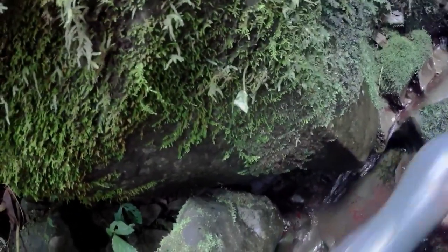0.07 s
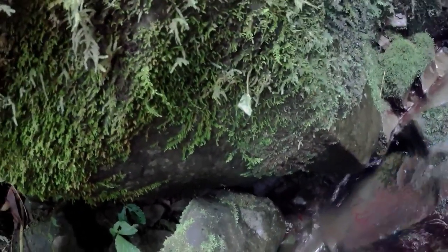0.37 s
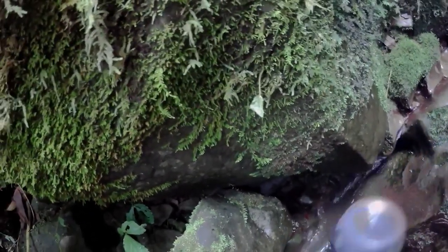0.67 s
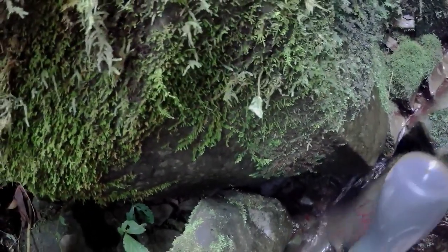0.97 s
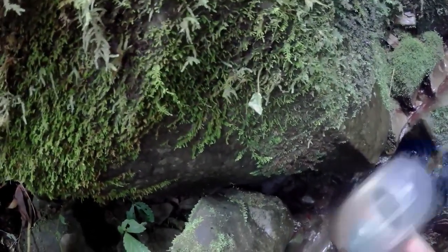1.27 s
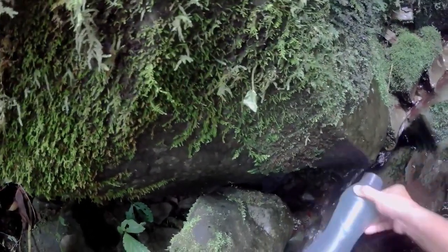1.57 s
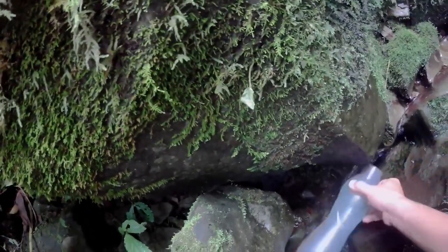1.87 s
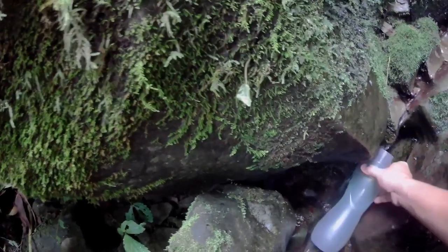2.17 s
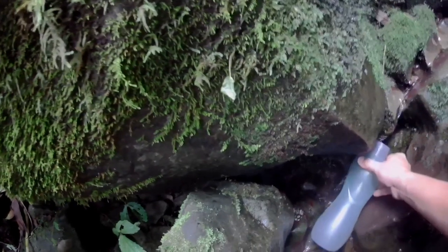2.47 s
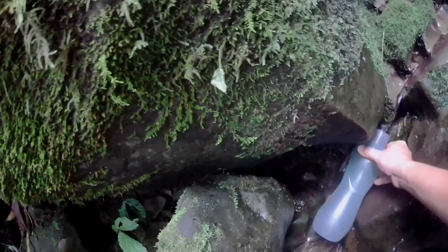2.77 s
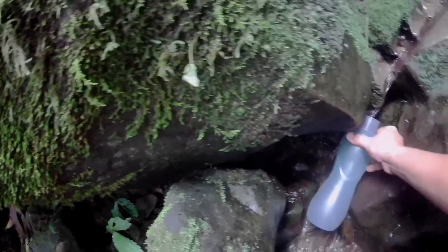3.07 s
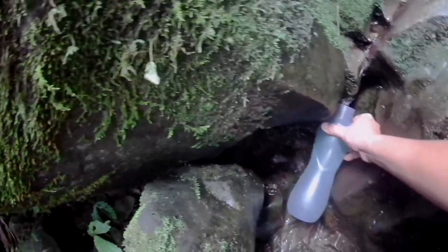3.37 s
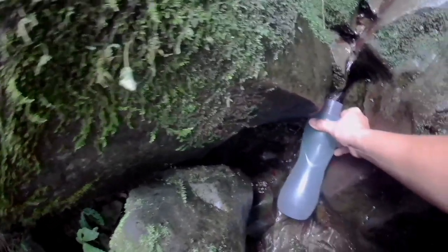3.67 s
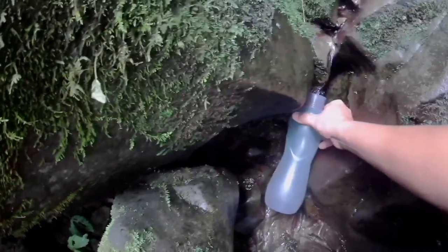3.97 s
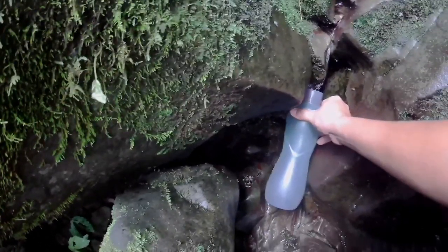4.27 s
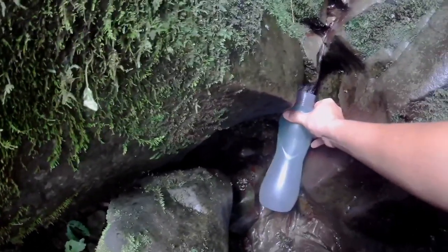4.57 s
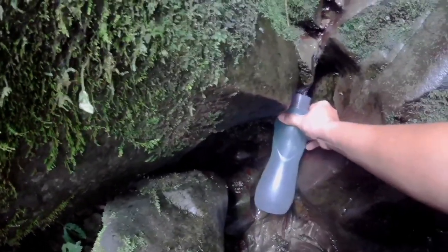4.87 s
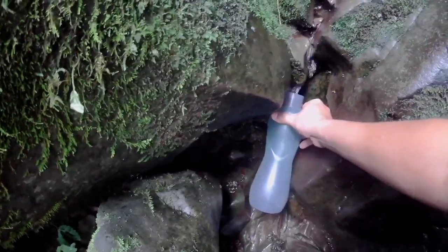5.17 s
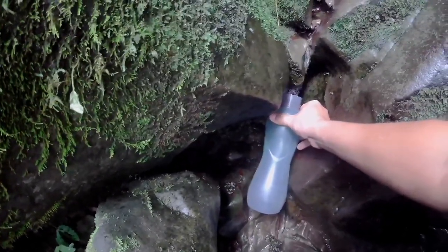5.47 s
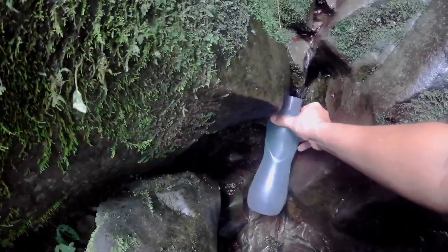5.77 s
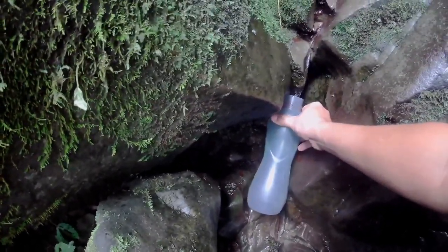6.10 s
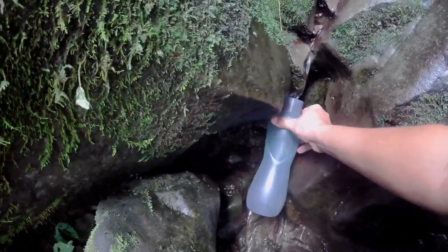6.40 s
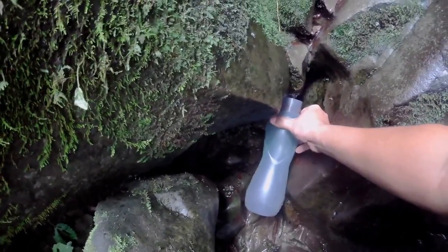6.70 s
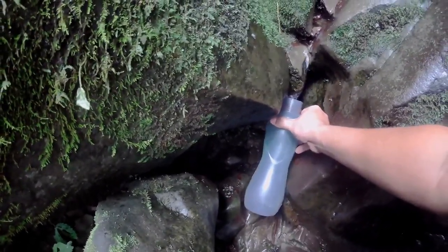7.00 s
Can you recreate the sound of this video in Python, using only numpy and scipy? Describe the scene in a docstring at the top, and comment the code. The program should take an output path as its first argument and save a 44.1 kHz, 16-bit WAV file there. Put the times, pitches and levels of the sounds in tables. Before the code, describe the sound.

Spring water trickles and plinks off a rock as a plastic bottle knocks sharply on stone, then fills with a faint patter.

```python
"""Water plinks and spatters: a thin spring runs off a mossy forest rock into a shallow pool.
Drops burst on stone and trap bubbles, which ring and rise in pitch. An empty plastic bottle is
tipped out with hollow sloshes and knocks hard on the stone, ringing its shell and air column.
Held into the trickle, it catches the stream: the pool quietens and water patters faintly inside.
A low rumble swells now and then over a steady hiss."""
import sys
import numpy as np
from scipy import signal
from scipy.fft import rfft, irfft
from scipy.io import wavfile
from scipy.ndimage import uniform_filter1d

SR = 44100
rng = np.random.default_rng(int(sys.argv[2]) if len(sys.argv) > 2 else 0)


def master_out(mix):
    """Clip the mix to full scale and print it as 16-bit PCM to the path in sys.argv[1]."""
    frames = np.transpose(np.atleast_2d(mix))
    ceiling = np.clip(frames, -1, 1)
    pcm = np.round(ceiling * 32767).astype(np.int16)
    wavfile.write(sys.argv[1], SR, pcm)


N = 314874
TIME = np.arange(N) / SR

# large bubbles: trapped by drops in the pool, and from about 5.9 s glugs in the neck of the filling bottle:
# t/s, peak/dB, f/Hz, swell/cycles
BUBBLES = [(.001,-26,545,1.4),(.004,-19.5,2530,0.37),(0.015,-36,1620,11),(.03,-30,3620,5.5),(.034,-39,2820,3.6),(0.035,-38,1690,10),(.06,-35.5,1280,6),(.108,-29,2110,2.9),(.134,-30.5,1190,2.7),(.138,-33,2330,3.5),(0.144,-28.5,1440,3.5),(.162,-35,1930,8.8),(.203,-32.5,1920,5),
           (0.181,-23.5,4220,3.1),(0.2556,-22.5,2350,2.2),(0.283,-32,1720,3.6),(0.293,-25.5,1410,1.8),(.307,-29,3330,3.6),(.388,-39,2380,4),(.324,-22,2360,3),(0.333,-18.5,940,1.1),
           (0.442,-18.5,5730,5.9),(.47,-20.5,520,0.93),(0.4739,-14,1050,2.3),(0.479,-22,1390,3.4),(.501,-17,1820,1.1),(0.524,-22.5,1050,1),(0.531,-30,2400,4.2),(0.586,-24.5,2480,3.6),(0.639,-25,2260,9),
           (.555,-32,2560,3),(.663,-29,3200,3),(0.679,-25,2080,1.3),(.69,-31,1980,4.7),(.739,-34,2250,4),(.762,-32,1570,2.1),(0.802,-31,2120,3.5),(0.8197,-25,2800,1.4),(0.83,-17.5,1815,3.2),(0.838,-24,772,3),(.873,-22,2960,1.8),(0.872,-26,1430,5.4),(0.893,-22,1274,3.4),(0.928,-24,7840,8.6),(0.94,-29,1850,5.6),
           (0.9697,-20,1370,2.1),(0.969,-25.5,2420,3.3),(1.009,-31,1580,3),(1.016,-33,776,4.5),(1.018,-30.5,1490,3),(1.041,-25,2630,3),(1.103,-28.5,2580,1.5),(1.089,-34.5,1460,3.3),(1.105,-30,1040,1.3),
           (1.165,-26.5,4500,3.1),(1.183,-37,856,1.6),(1.188,-35,1450,3),(1.29,-33,5540,6.3),(1.324,-32.5,1930,3.3),(1.543,-23,1330,1.1),(1.732,-35.5,3390,7.8),(1.757,-33,2380,5.8),(1.627,-38,1870,2.5),(1.799,-32.5,2450,2.5),(1.835,-28.5,1990,1.6),
           (1.8743,-21.5,2440,2.4),(1.875,-20,1476,4.5),(1.943,-24.5,1030,2.7),(1.942,-29,1950,2.5),(1.947,-29,493,0.93),(1.962,-34,3450,4.3),
           (1.97,-21,1420,3.1),(1.9688,-25,2310,1.6),(2.0026,-26.5,1750,2.3),(2.002,-27,487,1.5),(2.008,-25.5,670,0.93),(2.016,-29,880,1.6),(2.03,-40,1300,2.1),(2.046,-22.5,1250,1.6),(2.05,-23,2090,2.2),(2.051,-38,530,3.8),(2.061,-30,2470,3.6),(2.097,-37,2550,3),(2.099,-32.5,3400,4.5),
           (2.16,-34,1210,3.1),(2.192,-34,1020,2.6),(2.207,-26,1380,3.4),(2.215,-28.5,975,3.5),(2.362,-29.5,2910,3.4),(2.381,-33,2220,4),(2.208,-24,3300,1.4),(2.331,-26,1150,0.95),(2.371,-31,784,2.8),(2.399,-37,1480,5.5),(2.47,-25.5,3150,2),
           (2.517,-22,890,0.86),(2.558,-26.5,1100,1.7),(2.565,-25,1150,0.96),(2.524,-37,2530,3),(2.623,-17.5,1197,3.4),(2.631,-26,1350,2.9),(2.674,-30.5,3000,2.5),(2.708,-33,3000,3.4),(2.723,-20,1210,2.5),(2.8,-31.5,1500,3.5),(2.873,-32,2790,4.7),
           (2.88,-24.5,1780,0.32),(2.907,-34,1330,2),(2.9152,-19,1095,2.9),(2.887,-37,2430,4),(2.931,-26,1160,2.8),(2.951,-26.5,944,2.6),(2.958,-25,1000,1.8),(3.123,-29.5,620,1.9),(3.126,-23,2690,2.1),(3.149,-33,806,2.9),(3.157,-23,1800,0.54),(3.181,-31.5,1230,2),(3.233,-33,1170,2),(3.262,-34.5,5900,13),(3.352,-27.5,1490,5.9),(3.376,-31,1870,9.9),
           (3.406,-31,2490,4.1),(3.532,-24,1110,2),(3.537,-11.5,1060,2.6),(3.579,-31.5,2460,6.4),(3.592,-24,793,1.4),(3.616,-26,740,2.1),
           (3.655,-34,4340,4),(3.665,-33,890,7.6),(3.701,-27,2480,1.7),(3.689,-27,1246,5.9),
           (3.7422,-20.5,620,0.34),(3.743,-25,2400,1.1),(3.794,-30,3200,2.6),(3.824,-39,780,4.9),(3.753,-25,2750,4.2),(3.799,-21,636,0.71),(3.9358,-21.5,2415,5.3),(3.982,-26,934,2.5),(3.992,-28,6600,8.5),(4.016,-31.5,1270,6.7),
           (4.057,-27.5,2715,4.7),(4.059,-25,1250,0.88),(4.143,-31.5,604,0.46),(4.19,-37,1190,4),(4.247,-32,1240,4),(4.31,-36.5,950,2.7),(4.409,-34,1100,2.8),(4.523,-27.5,1485,4.4),(4.524,-31.5,2530,3),(4.721,-37.5,950,2.2),(4.624,-41,6030,14),(4.566,-41,1280,2.1),(4.811,-41,1130,2.5),(4.97,-41,1740,4),(5.035,-41,960,2.8),(5.09,-41.5,5970,11),(5.16,-39,1300,3),(5.193,-33.5,1850,4.6),
           (5.565,-29,533,0.24),(5.827,-42.5,3700,5.5),(5.828,-37.5,1400,3.7),(5.89,-27,945,4.3),(5.926,-33,960,3.2),(5.952,-27.5,950,3.1),(6.016,-34.5,974,3.7),(6.036,-37,970,2.1),(6.052,-36.5,1160,3.5),(6.218,-25,945,1.5),(6.224,-27,1290,2),
           (6.268,-39.5,3520,12),(6.51,-29,933,3.8),(6.525,-38,910,2.5),(6.561,-29.5,940,3.7),(6.557,-38.5,4120,5),(6.593,-37,3180,4.3),(6.645,-28.5,1160,0.9),(6.752,-28.5,1030,0.91),(7.118,-33.5,5930,13)]
# big drops on stone: t/s, level/dB, brightness/dB (added to the top band, taken from the low one)
STONE_DROPS = [(.088,-44,24),(0.133,-31.5,-11.5),(0.1573,-31.5,16),(.181,-33,6),(0.19,-29,17),(.202,-34,15),(0.2562,-42,-20),(.285,-40,23),(.471,-34,15),
               (0.311,-25,11.5),(0.38,-30,-5),(0.4411,-20,-4.5),(0.498,-27,11.5),(0.529,-33,-11),(0.552,-32,15),(.584,-27,-9),(.663,-39,20),(0.671,-32,-8),
               (0.725,-32.5,15),(0.819,-28.5,-9),(.83,-31.5,-16.5),(0.884,-39,27),(0.9272,-35,-14.5),(0.97,-46,-12),(.978,-42,16),(.991,-29,20.5),(1.013,-27.5,-7),(1.101,-28.5,-9),(1.165,-30.5,-3),
               (1.2617,-29.5,10),(1.288,-43,6.5),(1.5,-23,9),(1.632,-32.5,12),(1.693,-33.5,-3),(1.757,-32.5,16),(1.82,-28,14),(1.853,-40,24),(1.8745,-44,-7),
               (1.97,-28.5,2),(2.004,-40,23),(2.047,-38,18),(2.333,-38,21),(2.3,-28.5,16),(2.4885,-39.5,26),(2.524,-30.5,20.5),(2.67,-37.5,21.5),(2.713,-24.5,1),(2.7202,-29.5,-8),(2.873,-43,21),(2.942,-38,21),(3.081,-42,23.5),
               (3.12,-32,-14),(3.123,-34,19),(3.161,-31,12),(3.182,-33.5,10),(3.262,-31,-1),(3.302,-31,-1),(3.3493,-34.5,-16),(3.46,-33.5,-11),(3.572,-31,16),(3.612,-28,-8.5),(3.673,-27,1),(3.689,-26,11),(3.701,-32,9),
               (3.797,-34,20.5),(3.99,-27,0),(4.059,-31,-15),(4.141,-39.5,-13.5),(4.247,-37,16),(4.524,-45,-14),(5.2,-34.5,9),(5.562,-47.5,-18),
               (6.49,-39.5,-5),(6.644,-42,-8),(7.118,-42,-4)]

RISE_PER_SWELL = .023  # relative pitch climb while a bubble swells
CATCH_S, CATCH_RAMP_S, CATCH_LOSS_DB = 3.8, .28, 6.5  # the bottle takes the stream from the pool


def plinks(slap_db=-12, slap_attack_s=.0018, slap_t60_s=.029, echo_db=-15, drip_cycles=1.8):
    """Each bubble comes with a slap of water and rings; the nearest stone echoes the tone."""
    out, t = np.zeros(N), np.arange(3072) / SR
    drips = [(s, db, log_between(3440, 1000, size), drip_cycles) for s, db, size in small_drips()]
    for s, db, hz, cycles in BUBBLES + drips:
        slap = rms_one(filtered(rng.standard_normal(len(t)), [.55 * hz, 2 * hz], "band"))
        slap *= splash_envelope(t, slap_attack_s, slap_t60_s)
        add(out, s - slap_attack_s, from_db(db + slap_db) * slap)
        tone = from_db(db) * bubble(hz, cycles, RISE_PER_SWELL * hz / cycles)
        add(out, s, tone)
        add(out, s + rng.uniform(.004, .008), from_db(echo_db) * tone)
    return out


def bubble(hz, cycles, rise_per_s, roundness=1.5):
    """A bubble swells for `cycles` and climbs in pitch, damped ever harder near the surface."""
    swell_s = max(cycles / hz, 1e-4)
    t = np.arange(int(7 * swell_s * SR)) / SR
    age = t / swell_s
    envelope = age * np.exp((1 - age ** roundness) / roundness)  # 1: ringing tail, 2: round plop
    return envelope * np.sin(2 * np.pi * hz * (t + rise_per_s * t * t / 2))


def offshoots(level_db=-13.5, spread_db=6, scatter_s=.01, cycles=1.5):
    """Each large bubble tears off three lesser ones, fainter once the stream is caught."""
    out = np.zeros(N)
    for s, db, parent_hz, _ in BUBBLES:
        for late, size, strength in rng.random((3, 3)):
            hz = parent_hz * log_between(.7, 2.1, size)
            gain = from_db(db + level_db + spread_db * strength - 2 * CATCH_LOSS_DB * caught(s))
            add(out, s + late * scatter_s, gain * bubble(hz, cycles, 2 * RISE_PER_SWELL * hz / cycles))
    return out


def splats(level_db=-4, attack_s=.0028, t60_s=.032, ragged_db=4, stagger_s=.0017, band_share=.62):
    """Drops burst on stone in three ragged noise bands; smaller drips are brighter."""
    out, t = np.zeros(N), np.arange(3072) / SR
    envelope = splash_envelope(t, attack_s, t60_s)
    drips = [(s, db - 10, 5 * (1 - 2 * size)) for s, db, size in small_drips()[::2]]
    for s, db, bright_db in STONE_DROPS + drips:
        bands = (4430, 9900, 0), (1130, 4650, -1 - bright_db), (8850, 16400, -10.5 + bright_db)
        for low_hz, high_hz, band_db in bands:
            noise, flutter = rng.standard_normal((2, len(t)))
            place, late = rng.random(2)
            edges = place * (1 - band_share) + np.array([0, band_share])  # this drop's part of the band
            burst = rms_one(filtered(noise, log_between(low_hz, high_hz, edges), "band"))
            flutter = rms_one(uniform_filter1d(flutter, size=100))
            ragged = rms_one(from_db(ragged_db * np.tanh(flutter)))
            start_s = s - attack_s / 2 + stagger_s * (late - .5)
            add(out, start_s, from_db(db + level_db + band_db) * ragged * burst * envelope)
    return out


def sparkle(level_db=-8, low_hz=3000, high_hz=9000, cycles=5.1, scatter_s=.011):
    """Each big splash traps three tiny, high bubbles."""
    out = np.zeros(N)
    for s, db, _ in STONE_DROPS:
        for late, size in rng.random((3, 2)):
            hz = log_between(high_hz, low_hz, size)
            tone = bubble(hz, cycles, RISE_PER_SWELL * hz / cycles)
            add(out, s + late * scatter_s, from_db(db + level_db) * tone)
    return out


def small_drips(full_flow_per_s=18, level_db=-38.5, spread_db=3.5, candidates=400):
    """Random drips, fewer and fainter as the flow falls: t/s, level/dB, size/0-1."""
    when, chance, size = rng.random((candidates, 3)).T
    s = when * TIME[-1]
    flow_db, _ = flow_at(s)
    db = level_db + .3 * flow_db - CATCH_LOSS_DB * caught(s)
    db += spread_db * rng.standard_normal(candidates)
    per_s = full_flow_per_s * from_db(.74 * flow_db)
    return np.column_stack([s, db, size])[chance < per_s * TIME[-1] / candidates]


def flow_at(s):
    """Strength of the stream and of its spray, in dB re full flow."""
    # falling water: t/s, flow/dB, spray/dB
    strength = [(0.0, -41, -38.5), (0.34, -45, -47), (1.03, -46.5, -44.5), (1.23, -43, -48),
                (1.39, -48.5, -50), (1.53, -42.5, -45), (1.83, -50.5, -48.5), (2.2, -42.5, -43.5),
                (2.84, -47, -47.5), (3.02, -44.5, -54), (3.4, -49, -49), (3.64, -43, -46.5),
                (5.21, -54, -46.5), (5.81, -54, -67), (6.08, -48, -47), (6.3, -67, -47.5),
                (7.14, -51.5, -45.5)]
    full_flow_db, full_spray_db = -42.5, -44.5
    times, flow_db, spray_db = np.transpose(strength)
    return np.interp(s, times, flow_db) - full_flow_db, np.interp(s, times, spray_db) - full_spray_db


def caught(s):
    """Share of the stream that runs into the bottle."""
    return np.clip((s - CATCH_S) / CATCH_RAMP_S, 0, 1)


def knocks(thud_hz=165, thud_t60_s=.028, air_build_s=.0065):
    """Bottle on rock: the shell barks over a thud, the air rings on; soft contacts are duller."""
    # contacts: t/s, shell/dB, air/dB, thud/dB, low-pass/Hz, share of ring time left by the grip
    contacts = [(1.3968,13,2,-2,5500,0.9),(1.402,13,-28,-34,3020,0.36),(1.4689,7.5,-12.5,-31,1920,0.68),(1.4748,-4,-39,-36,1600,0.27),(1.4906,1.5,-10,-40,970,0.73),(1.4965,-4,-36,-42,1100,0.46),
                (2.2062,-3.5,-11,-50,480,0.7),(2.2146,-19,-27,-49,420,0.37),(2.2534,-6,-18.5,-55,334,0.91),(2.279,-15,-29,-54,330,0.68),(2.306,-13,-35,-54,300,0.37)]
    # standing waves of the air inside: f/Hz, level/dB, t60/s
    air_modes = [(234,-2.5,.16),(772,-3,.165),(1680,0,.095),(2690,-34,.14)]
    # crack of plastic on stone: level/dB re shell, t60/s, top/Hz
    contact_crack = (-22, .018, 8200)
    crack_db, crack_t60_s, crack_top_hz = contact_crack
    out, t = np.zeros(N), np.arange(16384) / SR
    for s, shell_db, air_db, thud_db, soft_hz, ring_share in contacts:
        crack = rng.standard_normal(len(t)) * from_db(shell_db + crack_db - 60 * t / crack_t60_s)
        crack = filtered(crack, soft_hz, "low", order=1)
        thud = -ringing([(thud_hz, thud_db, thud_t60_s)], t)
        air = ringing([(hz, db, t60_s * ring_share) for hz, db, t60_s in air_modes], t)
        air *= 1 - np.exp(-(t / air_build_s) ** 2)
        body = from_db(shell_db) * struck_shell(t, ring_share) + thud + from_db(air_db) * air
        add(out, s, filtered(body, soft_hz, "low") + filtered(crack, crack_top_hz, "low", order=6))
    return out


def struck_shell(t, ring_share, dent_sharp=.05, relax_s=.005, detune=.015, spread_db=1.2):
    """A blow dents the shell, which rings sharp until it relaxes; no two blows ring alike."""
    # plastic shell: f/Hz, level/dB, t60/s
    shell_modes = [(285,-13,.045),(385,-14,.026),(520,-8.5,.026),(670,-8,.02),(875,-5,.023),(1000,-4,.022),(1120,0,.022),(1290,-8.5,.022),(1450,-10,.018),(1830,-17.5,.023),(2200,-24,.016),(2720,-24,.014),(3400,-23,.012),(4000,-17,.011),(5000,-25,.01)]
    bent_t = t + dent_sharp * relax_s * (1 - np.exp(-t / relax_s))
    chance = rng.standard_normal((len(shell_modes), 2))
    modes = [(hz * (1 + detune * pitch), db + spread_db * level, t60_s * np.sqrt(ring_share))
             for (hz, db, t60_s), (pitch, level) in zip(shell_modes, chance)]
    return filtered(ringing(modes, bent_t), 230, "high")  # a small shell radiates little bass


def sloshes(waver_db=2.8):
    """The bottle's air hums and bends in pitch as water sloshes past the neck."""
    # one curve per slosh: t/s, f/Hz, level/dB
    hums = [
        [(.012,827,-57),(.026,804,-34),(.052,786,-50),(.061,778,-28.5),(.095,743,-44),(.145,622,-49.5),(.18,600,-50)],
        [(.615,151,-65),(.645,137,-40.5),(.69,75.5,-55),(.77,152,-53)],
        [(.785,187.4,-60),(.8,208.5,-38.5),(.86,219,-53),(.93,222,-67)],
    ]
    out, waver = np.zeros(N), waver_db * drift(89.04)
    for curve in hums:
        hz, db = in_time(curve)
        sounding = (TIME >= curve[0][0]) & (TIME < curve[-1][0])
        out += sounding * from_db(db + waver) * np.sqrt(2) * np.sin(2 * np.pi * np.cumsum(hz) / SR)
    return out


def rim_fizz(band_hz=(3620, 4420)):
    """The stream frays on the rim of the neck and fizzes."""
    # fizz: t/s, level/dB
    levels = [(4.05,-77),(4.14,-51),(4.29,-55.5),(4.38,-66),(4.55,-77)]
    spatter = ragged_noise(spread_db=3, rate_hz=150)
    return from_db(in_time(levels)[0]) * rms_one(filtered(spatter, band_hz, "band", order=4))


def patter_inside(droplets, level_db=-57.5, sag_db_per_s=1.8):
    """Caught water patters in the bottle, softer as it deepens."""
    # bottle resonances: f/Hz, width/Hz, gain/dB
    resonances = [(3000,320,11),(5520,180,12),(5900,260,2)]
    patter = coloured(droplets, [(2000, -30), (4000, -25), (7000, -7.5), (10000, 2.5)], resonances)
    return from_db(level_db - sag_db_per_s * (TIME - CATCH_S)) * caught(TIME) * patter


def gurgle(bubbles_per_s=400, spread_db=2.8, churn_db=-2, candidates=4000):
    """Countless small bubbles, damped within a few cycles, amid churning water."""
    # gurgle spectrum: f/Hz, level/dB
    spectrum = [(60,-8),(300,7.5),(550,2),(900,7.5),(1400,6),(2000,4.5),(2700,-4.5),(4200,-6.5)]
    bubbles = np.zeros(N)
    for when, pitch, size, length, chance in rng.random((candidates, 5)):
        if chance < bubbles_per_s * TIME[-1] / candidates:
            hz = log_between(350, 4550, pitch)
            size_db = spread_db * min(-np.log(size + 1e-9), 3)
            tone = bubble(hz, cycles=.7 + 2 * length, rise_per_s=8)
            add(bubbles, when * TIME[-1], from_db(size_db) * hz * tone)
    churn = ragged_noise(spread_db=4.6, rate_hz=120)
    return rms_one(coloured(bubbles, spectrum) + from_db(churn_db) * coloured(churn, spectrum))


def spray(droplets_per_s=750, spread_db=3.2, t60_s=.036):
    """Tiny droplets land at random, each a puff of fizz in one of five bands."""
    # spray spectrum: f/Hz, level/dB
    spectrum = [(1500,13.5),(2600,27.5),(4000,3.5),(6000,18.5),(7300,11),(9000,6),(12000,9.5),(16000,-26)]
    out = np.zeros(N)
    for low_hz in (1500, 2500, 4200, 7000, 11000):
        lands = rng.random(N) < droplets_per_s / 5 / SR
        energy = lands * from_db(2 * spread_db * np.minimum(rng.exponential(1, N), 3))
        power = signal.lfilter([1], [1, -from_db(-120 / (t60_s * SR))], energy + 1e-18)
        out += filtered(np.sqrt(power) * rng.standard_normal(N), [low_hz, 1.367 * low_hz], "band")
    return coloured(out, spectrum)


def sizzle(level_db=-56.5, band_hz=(8000, 14500)):
    """The finest mist sizzles on wet stone, fainter once the stream is caught."""
    mist = rms_one(filtered(ragged_noise(spread_db=3.5, rate_hz=260), band_hz, "band"))
    return from_db(level_db - 2 * CATCH_LOSS_DB * caught(TIME)) * mist


def among_rocks(x, tail_db=-17, tail_t60_s=.064):
    """Close reflections and a short scatter from stones and plants."""
    # rock faces: delay/s, level/dB
    reflections = [(.0031,-20),(.0058,-24.5),(.0093,-25)]
    t = np.arange(8192) / SR
    scatter = filtered(rng.standard_normal(len(t)), 4700, "low")
    scatter *= from_db(-60 * t / tail_t60_s) * (t > .004)
    response = from_db(tail_db) * scatter / np.sqrt(np.sum(scatter ** 2))
    response[0] += 1
    for delay_s, db in reflections:
        add(response, delay_s, from_db([db]))
    return signal.fftconvolve(x, response)[:N]


def rumble(rest_db=-63, attack_s=.017, sag_db_per_s=5.5, t60_s=.24):
    """Low noise: each swell comes up quickly, sags and dies away."""
    # swells: t/s, length/s, level/dB
    swells = [(2.312,0.085,-49.5),(3.533,0.28,-42.5),(5.953,0.44,-49)]
    # rumble spectrum: f/Hz, level/dB
    spectrum = [(20,-5),(90,-4.5),(200,-6.5),(350,-11),(600,-21),(1200,-19),(3000,-33)]
    gain = from_db(rest_db)
    for s, length_s, db in swells:
        t = np.maximum(TIME - s, 0)
        fall_db = sag_db_per_s * t + 60 * np.maximum(t - length_s, 0) / t60_s
        gain = gain + np.minimum(t / attack_s, 1) * from_db(db - fall_db)
    return gain * coloured(rng.standard_normal(N), spectrum)


def hiss():
    """Steady hiss of the surroundings."""
    # hiss spectrum: f/Hz, level/dB
    spectrum = [(25,-5),(130,-1.5),(450,1),(800,-2),(1300,-2),(1700,-6.5),(3050,-5),(3400,-9),(4700,-12),(7200,-13),(9600,-18.5),(11800,-15),(13000,-11.5),(14500,-11.5),(15500,-18.5)]
    # humps and dips: f/Hz, width/Hz, gain/dB
    humps = [(1630,110,-3),(2780,300,2.5),(3950,300,1.5),(5560,220,7),(6070,280,7.5),(7100,350,-2),(8300,550,3.5),(13680,220,5.5)]
    # slow drift: t/s, level/dB
    levels = [(0,-48),(1.3,-50),(4.3,-48.5),(5.7,-52),(6.1,-49.5),(7.14,-47.5)]
    return from_db(in_time(levels)[0]) * coloured(rng.standard_normal(N), spectrum, humps)


def gain_control(x, threshold_db=-5, range_db=10, release_db_per_s=90, attack_hz=42):
    """Loud peaks pull the gain down within milliseconds; it creeps back."""
    over_db = np.clip(20 * np.log10(np.abs(x) + 1e-9) - threshold_db, 0, range_db)
    release_db = release_db_per_s * TIME
    held_db = np.maximum.accumulate(over_db + release_db, axis=-1) - release_db
    return x * from_db(-filtered(held_db, attack_hz, "low"))


def ringing(modes, t):
    """Struck modes (f/Hz, level/dB, t60/s); neighbours swing in opposite directions."""
    return sum((-1) ** k * from_db(db - 60 * t / t60_s) * np.sin(2 * np.pi * hz * t)
               for k, (hz, db, t60_s) in enumerate(modes))


def splash_envelope(t, attack_s, t60_s):
    """Smooth build-up, exponential decay."""
    return (1 - np.exp(-(t / attack_s) ** 2)) * from_db(-60 * t / t60_s)


def ragged_noise(spread_db, rate_hz):
    """White noise with a flickering level."""
    return rng.standard_normal(N) * from_db(spread_db * drift(rate_hz))


def drift(rate_hz):
    """Smooth random curve, rms 1."""
    return rms_one(np.interp(TIME * rate_hz, np.arange(4096), rng.standard_normal(4096)))


def coloured(x, spectrum, humps=()):
    """Shape by a log-frequency curve plus Gaussian humps; rms 1."""
    hz = np.linspace(0, SR / 2, N // 2 + 1)
    points_hz, points_db = np.transpose(spectrum)
    db = np.interp(np.log(hz + 1e-9), np.log(points_hz), points_db)
    db += sum(gain_db * np.exp(-((hz - centre) / width) ** 2) for centre, width, gain_db in humps)
    return rms_one(irfft(rfft(x) * from_db(db), N))


def filtered(x, hz, kind, order=2):
    """Causal Butterworth filter."""
    sos = signal.butter(order, np.clip(hz, 10, SR / 2 - 500), kind, fs=SR, output="sos")
    return signal.sosfilt(sos, x)


def in_time(rows):
    """Each column of a curve at every sample."""
    s, *columns = np.transpose(rows)
    return [np.interp(TIME, s, column) for column in columns]


def add(out, s, sound):
    """Mix a sound in at time s."""
    i = min(max(round(s * SR), 0), N)
    out[i:i + len(sound)] += sound[:N - i]


def log_between(start, end, share):
    return start * (end / start) ** share


def from_db(db):
    return 10 ** (np.asarray(db) / 20)


def rms_one(x):
    return x / np.sqrt(np.mean(x ** 2) + 1e-20)


def scene(gurgle_db=-43, spray_db=-49, spray_loss_db=7):
    """Water and bottle among the rocks, over hiss and rumble."""
    flow_db, fine_db = flow_at(TIME)
    droplets = spray()
    wash = from_db(gurgle_db + 1.46 * flow_db) * gurgle()
    wash += from_db(spray_db + 1.5 * fine_db - spray_loss_db * caught(TIME)) * droplets
    background = hiss()
    bottle = knocks() + sloshes() + rim_fizz() + patter_inside(droplets)
    background += rumble()
    water = wash + sizzle() + sparkle() + plinks() + offshoots() + splats()
    return (among_rocks(water + bottle) + background)[None]


def record(dry, ceiling=.82, cutoff_hz=15700):
    """The hardest knock outruns the gain control and clips softly; the top treble is cut."""
    x = gain_control(dry)
    clipped = x / (1 + (x / ceiling) ** 8) ** (1 / 8)
    return signal.sosfilt(signal.ellip(10, .1, 80, cutoff_hz, fs=SR, output="sos"), clipped)


dry = scene()
out = record(dry)
master_out(out)
```